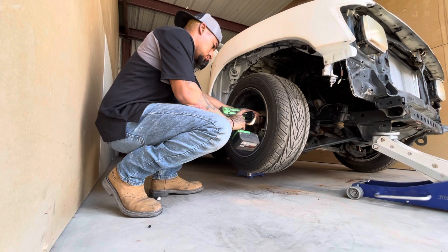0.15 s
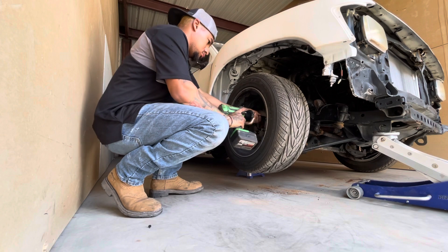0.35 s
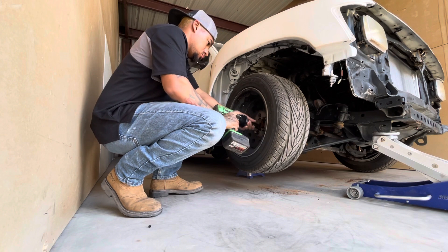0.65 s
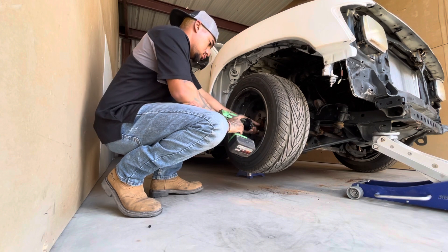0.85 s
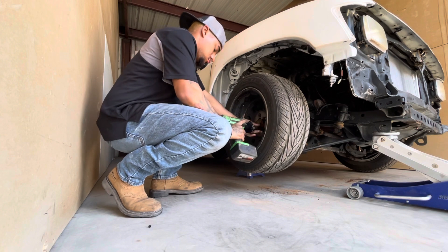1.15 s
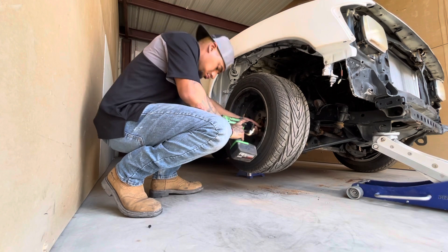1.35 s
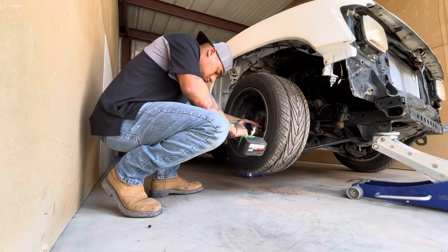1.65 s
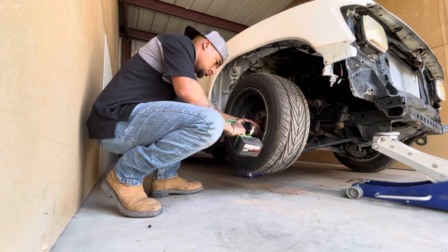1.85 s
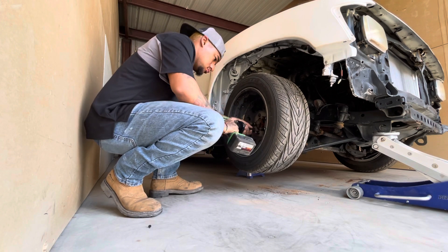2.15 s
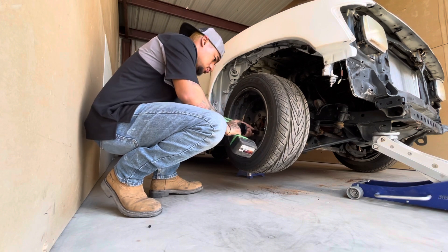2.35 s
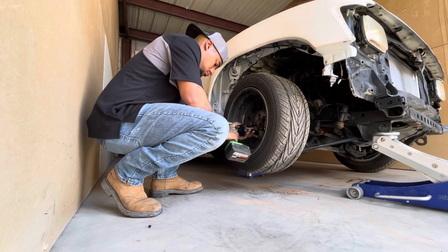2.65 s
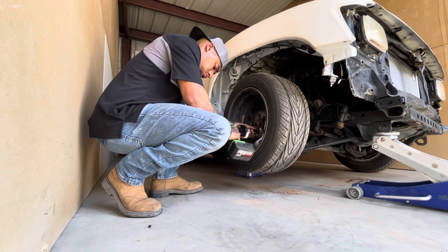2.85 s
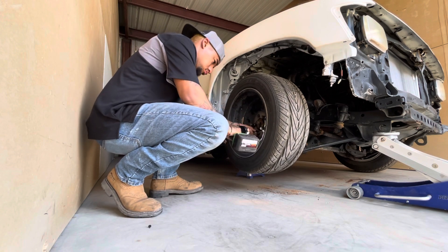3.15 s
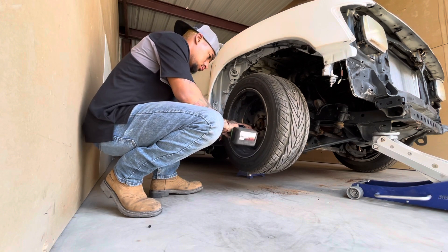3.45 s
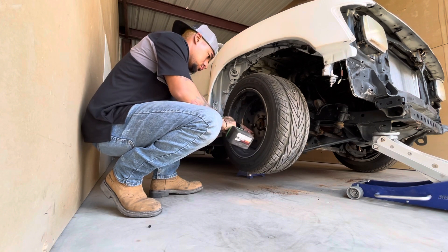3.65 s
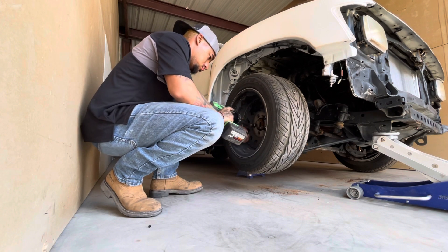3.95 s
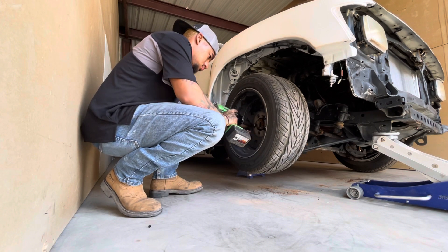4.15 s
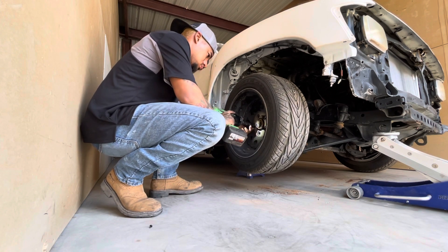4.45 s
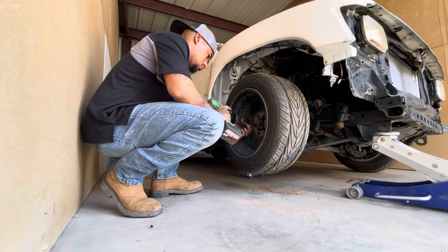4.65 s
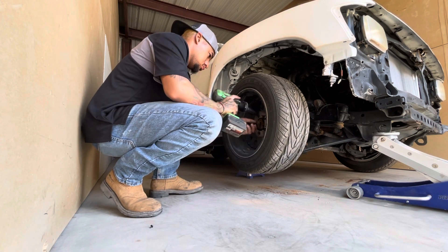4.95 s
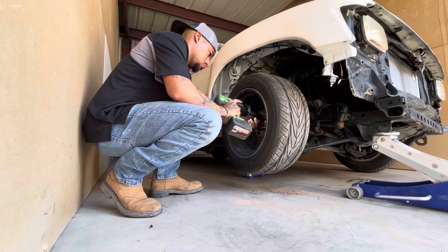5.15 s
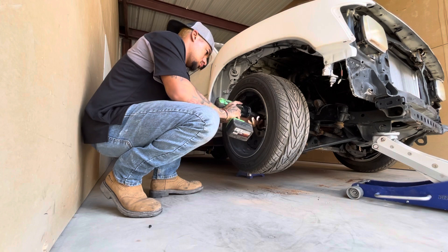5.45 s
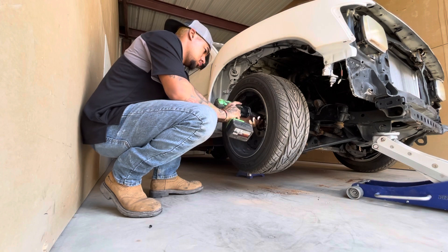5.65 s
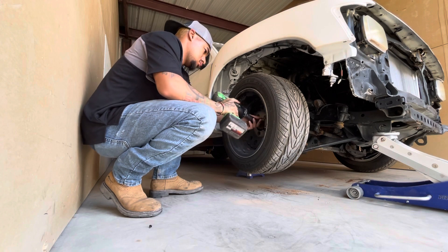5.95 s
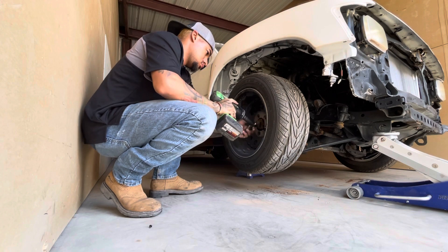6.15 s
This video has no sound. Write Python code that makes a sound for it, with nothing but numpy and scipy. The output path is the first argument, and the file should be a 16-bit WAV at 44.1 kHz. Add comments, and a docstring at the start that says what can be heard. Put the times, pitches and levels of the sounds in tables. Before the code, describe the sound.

Short rattling, whirring bursts from an impact wrench loosening wheel nuts, the socket clinking against steel in a slightly echoing garage.

```python
"""A cordless impact wrench loosens wheel nuts in a bare garage: five trigger pulls, three with blows.
The motor whines over rattling gear noise; the hammer cracks on the anvil and rings socket and hub.
The socket clacks and rubs on nuts and rim, and the shaken tyre booms in its low modes.
Wind brushes the two microphones; a faint whistle falls once over still air."""
import sys
import numpy as np
from scipy import signal
from scipy.fft import rfft, irfft, next_fast_len
from scipy.io import wavfile
from scipy.ndimage import uniform_filter1d

SR = 44100
rng = np.random.default_rng(int(sys.argv[2]) if len(sys.argv) > 2 else 0)


def to_wav(sig):
    """Store sig (one row per channel, or 1-D mono) as 16-bit WAV at the path in sys.argv[1].

    Samples outside -1..1 are clipped; the rate is SR.
    """
    pcm = np.clip(np.atleast_2d(sig), -1, 1) * 32767
    pcm = np.round(pcm).astype(np.int16)
    wavfile.write(sys.argv[1], SR, pcm.T)  # frames by channels


N = 277830
COAST_S = .3

# trigger pulls: start/s, release/s, spin-up/s, gear noise/dB, wheel shake/dB
PULLS = [(0, 0.29, 0.00032, -39, -46.5), (1.207, 1.806, 0.012, -42.5, -46.5),
         (2.757, 3.358, 0.011, -42, -47.5), (4.216, 4.405, 0.078, -42.5, -50.5),
         (5.132, 5.848, 0.033, -41.5, -50)]
# hammer blows: t/s, level/dB, tilt/(dB/oct)
BLOWS = [(0.0024, -26, 0.5), (0.032, -31, 0), (1.257, -20, 1), (1.29, -23.5, 0.5), (1.3217, -25.5, 3),
         (1.3477, -23.5, 1), (1.378, -28, 3.5), (1.41, -23.5, 0.5), (1.441, -29, 3.5), (1.475, -26.5, 6),
         (2.806, -21, 0), (2.836, -22, 2), (2.868, -24.5, 1), (2.8996, -26.5, 4), (2.9309, -26.5, 0),
         (2.9618, -31, 0)]
# clack and rub colour, band-limited near 12.5 kHz: f/Hz, level/dB
CLACK_RUB_COLOUR = [(40, -59), (150, -22), (400, -13.5), (1000, -2), (2300, -2), (5000, -7.5), (9500, -7.5),
                    (12200, -14), (12900, -37.5), (14000, -67.5)]


def amp(db):
    return 10 ** (np.asarray(db) / 20)


def unit_rms(x):
    return x / np.sqrt(np.mean(x ** 2) + 1e-20)


def at_hz(points, hz):
    """Interpolates over log frequency."""
    f, value = np.transpose(points)
    return np.interp(np.log(hz + 1), np.log(f + 1), value)


def add(mix, start_s, sound):
    part = mix[round(start_s * SR):][:len(sound)]
    part += sound[:len(part)]


def coloured(x, colour):
    """Zero-phase shaping for steady noise."""
    hz = np.fft.rfftfreq(x.shape[-1], 1 / SR)
    return irfft(rfft(x) * amp(at_hz(colour, hz)), x.shape[-1])


def coloured_causal(x, colour, tilt_db_oct):
    """Minimum-phase shaping by folded cepstrum, tilted about 3 kHz."""
    hz = np.fft.rfftfreq(len(x), 1 / SR)
    gain_db = at_hz(colour, hz) + tilt_db_oct * np.log2((hz + 200) / 3000)
    cepstrum = irfft(np.log(amp(gain_db)))
    cepstrum[1:len(x) // 2] *= 2
    cepstrum[len(x) // 2 + 1:] = 0
    return irfft(rfft(x) * np.exp(rfft(cepstrum)))


def wander(count, span_samples):
    """Smooth random drift, unit RMS."""
    drift = uniform_filter1d(rng.standard_normal(count), span_samples)
    return unit_rms(uniform_filter1d(drift, span_samples))


def resonate(x, hz, width_hz, stages=1):
    """Unit-gain resonance: shift down, smooth, shift back."""
    carrier = np.exp(2j * np.pi * np.cumsum(hz * np.ones(len(x))) / SR)
    pole = np.exp(-np.pi * width_hz / SR)
    for _ in range(stages):
        x = 2 * (carrier * signal.lfilter([1 - pole], [1, -pole], x / carrier)).real
    return x


def swell_power(peak_s, db, rise_db_per_s, fall_db_per_s):
    t = np.arange(N) / SR - peak_s
    return amp(db + np.minimum(t * rise_db_per_s, -t * fall_db_per_s)) ** 2


def motor_db(t, held_s, spin_up_s):
    """Motor level: swell, hold, brake, coast."""
    brake_s, coast_db_per_s = .02, 143
    off_s = np.maximum(t - held_s, 0)
    swell_db = -16 * np.maximum(1 - t / spin_up_s, 0) ** 2
    brake_db = -2 * np.minimum(off_s / brake_s, 1)
    return swell_db + brake_db - coast_db_per_s * off_s


def gear_noise(start_s, release_s, spin_up_s, db):
    """Broadband rattle of gears and fan."""
    # gear noise colour, band-limited near 12.5 kHz: f/Hz, level/dB
    colour = [(90, -22), (160, -4.5), (500, -20), (1000, -8.5), (1700, 0), (3000, -5), (6000, -7),
              (9500, -5), (12200, -8.5), (12900, -48), (14000, -83)]
    t = np.arange(0, release_s - start_s + COAST_S, 1 / SR)
    level_db = db + motor_db(t, release_s - start_s, spin_up_s)
    blows_s = [s - start_s for s, *_ in BLOWS if start_s <= s < release_s]
    if blows_s:  # dip once the last blow frees the nut
        level_db -= 3.5 * np.exp(-((t - blows_s[-1] - .052) / .037) ** 2)
    rattle = amp(2 * wander(len(t), 83)) * rng.standard_normal(len(t))
    return amp(level_db) * unit_rms(coloured(rattle, colour)) * signal.windows.tukey(len(t), .01)


def wheel_shake():
    """Amplitude on the wheel: motor, blows and shoves add in power."""
    # tool shoved against the wheel: t/s, level/dB, fade/(dB/s)
    shoves = [(0.701, -49.5, 23), (2.268, -41, 63.5), (2.657, -40, 155.5), (4.1, -46, 126),
              (4.972, -38.5, 86), (5.3, -39, 16), (5.891, -69, 203)]
    rest_db, shove_rise_s = -61, .011
    power = np.full(N, amp(rest_db) ** 2)
    for start_s, release_s, spin_up_s, _, shake_db in PULLS:
        t = np.arange(0, release_s - start_s + COAST_S, 1 / SR)
        add(power, start_s, amp(shake_db + motor_db(t, release_s - start_s, spin_up_s)) ** 2)
    for s, db, _ in BLOWS:
        power += swell_power(s + .0057, db - 17, rise_db_per_s=900, fall_db_per_s=109)
    for s, db, fade_db_per_s in shoves:
        power += swell_power(s + shove_rise_s, db, 20 / shove_rise_s, fade_db_per_s)
    return np.sqrt(power)


def tyre_boom():
    """Shaking excites the low modes of tyre and body."""
    # tyre modes: f/Hz, level/dB, decay/s
    modes = [(103.1, 4, 0.15), (144.4, -5, 0.093), (184, -6, 0.042), (241, -8.5, 0.27), (320, -14.5, 0.36),
             (402.6, -12.5, 0.05), (458, -7.5, 0.6), (727, -12, 0.021)]
    hz = np.fft.rfftfreq(N, 1 / SR)
    response = sum(amp(db) / (1 + 1j * (hz - f) * decay_s) for f, db, decay_s in modes)
    response /= 1 + (hz / 1200) ** 4  # the boom fades away above about 1.2 kHz
    response *= hz ** 2 / (hz ** 2 + 60 ** 2)
    return wheel_shake() * unit_rms(irfft(rfft(rng.standard_normal(N)) * response, N))


def wind():
    """Low lumpy pressure, mostly separate at each microphone."""
    # breeze: t/s, level/dB
    breeze = [(0.0, -42.5), (0.26, -50), (0.65, -53.5), (1.09, -58), (1.32, -86), (1.61, -67), (1.88, -48),
              (2.0, -54.5), (2.39, -50.5), (2.8, -67.5), (2.95, -52), (3.44, -51), (3.77, -50), (3.98, -51),
              (4.3, -58), (4.51, -53.5), (4.84, -69), (5.05, -46), (5.75, -58), (6.16, -73), (6.3, -75.5)]
    # buffets: peak/s, level/dB, deep-bass share/1
    gusts = [(3.628, -51, .5), (3.733, -44, 0.19), (3.894, -38.5, 0), (3.968, -54.5, 0.53),
             (4.067, -47, 0.45), (4.181, -44, 0.99), (5.82, -42, 1)]
    # colours: f/Hz, level/dB
    deep_colour = [(15, -40), (40, -10), (60, 1.5), (85, -1), (150, -10), (400, -49.5), (2000, -100)]
    gust_colour = [(50, -13.5), (130, 1.5), (250, -4), (450, -13), (800, -48.5), (2000, -100)]
    common, left, right = rng.standard_normal((3, N))
    air = np.array([left, right]) + .091 * common
    lumps = amp(.64 * wander(N, 500))
    breeze_power = amp(np.interp(np.arange(N) / SR, *np.transpose(breeze))) ** 2
    swells = np.array([swell_power(s, db, 252, 310) for s, db, _ in gusts])
    deep_share = np.array([share for *_, share in gusts])
    rumble = np.sqrt(breeze_power + deep_share @ swells) * unit_rms(coloured(air, deep_colour))
    buffets = np.sqrt((1 - deep_share) @ swells) * unit_rms(coloured(air, gust_colour))
    return lumps * (rumble + buffets)


def still_air(db):
    """Steady stereo noise floor."""
    # noise floor colour: f/Hz, level/dB
    colour = [(180, -39.5), (300, -5.5), (430, -16.5), (620, -22), (1320, -17), (3400, -37.5),
              (4500, -39.5), (9000, -48.5), (11000, -108)]
    return amp(db) * unit_rms(coloured(rng.standard_normal((2, N)), colour))


def hammer_blow(db, tilt_db_oct):
    """A crack, doubled by the floor bounce, rings anvil, socket and hub; the hammer rebounds once."""
    # crack colour, band-limited near 12.5 kHz: f/Hz, level/dB
    colour = [(90, -37), (160, -12.5), (400, -3.5), (700, -4), (1400, 0.5), (2200, -2), (3400, 0.5),
              (6000, -5.5), (9500, -2.5), (12300, -4), (13200, -26.5), (16000, -39)]
    # anvil, socket and hub modes: f/Hz, width/Hz, level/dB
    modes = [(2050, 280, -18), (2800, 31, -6.5), (3390, 600, -11), (4935, 280, -8.5), (5730, 71, -5.5),
             (6950, 98, -20.5), (7600, 60, -7.5), (7880, 90, 3), (9160, 150, 2)]
    t = np.arange(4096) / SR

    def burst(start_s, tau_s):
        age = np.maximum(t - start_s, 0) / tau_s
        return age ** 2 * np.exp(-age)

    strike = burst(0, .001) + .35 * burst(.0033, .001)
    rebound = .079 * burst(.0053, .0054)
    crack = (strike + rebound) * rng.standard_normal(len(t))
    scatter_db = 3 * rng.standard_normal(len(modes))  # no two blows land alike
    ring = sum(amp(mode_db + offset_db) * resonate(crack, hz, width_hz)
               for (hz, width_hz, mode_db), offset_db in zip(modes, scatter_db))
    hub_clank = resonate(crack, hz=2000, width_hz=950, stages=2)
    impact = unit_rms(coloured_causal(crack, colour, tilt_db_oct))
    return amp(db) * unit_rms(impact + .41 * unit_rms(ring) + amp(-20) * unit_rms(hub_clank))


def clack(db, tilt_db_oct, clank_hz, clank_db, rise_ms):
    """A short steel scrape with one pitched clank rings the rim."""
    # rim modes: f/Hz, level/dB, t60/s
    modes = [(758, -2, .045), (1174, -1, 0.14), (2470, -3.5, .045), (2820, -8.5, 0.035),
             (4000, -12.5, .045), (4040, -7.5, .045), (5700, -10.5, .045), (9050, -11.5, 0.041)]
    t = np.arange(4096) / SR
    age = t * 1000 / rise_ms
    scrape = age * np.exp(-age) * rng.standard_normal(len(t))
    scatter_db = 3 * rng.standard_normal(len(modes))  # each touch finds another spot
    ring = sum(amp(mode_db + offset_db - 60 * t / t60_s) * np.sin(2 * np.pi * hz * t)
               for (hz, mode_db, t60_s), offset_db in zip(modes, scatter_db))
    contact = unit_rms(scrape) + .081 * unit_rms(ring) * (1 - np.exp(-age))
    contact = unit_rms(coloured_causal(contact, CLACK_RUB_COLOUR, tilt_db_oct))
    clank = unit_rms(resonate(scrape, clank_hz, width_hz=850, stages=2))
    return amp(db) * unit_rms(contact + amp(clank_db) * clank)


def motor_whine(track, mesh_db, flare_at_s):
    """Five partials follow motor speed through the housing; the gear mesh adds three rough lines."""
    # housing radiation: f/Hz, gain/dB
    housing = [(1400, 19), (1700, 10.5), (2200, 4), (3400, 4), (4500, -3.5), (5500, 8.5), (6500, 3.5),
               (8300, -0.5), (9300, -0.5), (12000, 2)]
    # partials 2-5: offset/dB
    offsets_db = [-1, 0, -2, -6]
    mesh_ratio, flutter_db = .545, 3.2  # partials flutter as the tool shifts in the hand
    s, hz, fundamental_db, overtones_db = np.transpose(track)
    t = np.arange(s[0], s[-1], 1 / SR)
    hz = uniform_filter1d(np.interp(t, s, hz), 600)  # rotor inertia
    phase = 2 * np.pi * np.cumsum(hz * (1 + .0015 * wander(len(t), 150))) / SR
    levels_db = [np.interp(t, s, fundamental_db)]
    levels_db += [np.interp(t, s, overtones_db) + db for db in offsets_db]
    whine = np.zeros(len(t))
    for k, db in enumerate(levels_db, 1):
        radiated_db = db + at_hz(housing, k * hz) + flutter_db * wander(len(t), 400)
        whine += amp(radiated_db) * np.sqrt(2) * np.sin(k * phase)
    noise = rng.standard_normal(len(t))
    mesh = sum(amp(db) * unit_rms(resonate(noise, k * mesh_ratio * hz, width_hz=70))
               for k, db in enumerate([4, -2, -7], 1))
    throb_db = 4.5 * wander(len(t), 350)  # the loose socket loads the gears unevenly
    flare_db = 5.5 * np.exp(-((t - flare_at_s) / .022) ** 2)
    return (whine + amp(mesh_db + throb_db + flare_db) * mesh) * signal.windows.tukey(len(t), .08)


def socket_rub(length_s, db):
    """Uneven grains of steel sliding on steel."""
    count = round(length_s * SR)
    grains = amp(2.4 * wander(count, 250)) * rng.standard_normal(count)
    colour = [(hz, level_db - 5 * np.log2(hz / 3000)) for hz, level_db in CLACK_RUB_COLOUR]
    return amp(db) * unit_rms(coloured(grains, colour)) * signal.windows.tukey(count, .3)


def faint_whistle():
    """Noise through a narrow falling resonance."""
    # glide: t/s, f/Hz, level/dB
    glide = [(3.86, 4560, -88.5), (3.9, 4370, -75), (3.939, 4160, -80.5), (3.96, 3400, -74.5),
             (4.019, 3530, -84)]
    s, hz, db = np.transpose(glide)
    t = np.arange(s[0], s[-1], 1 / SR)
    tone = resonate(rng.standard_normal(len(t)), np.interp(t, s, hz), width_hz=700, stages=2)
    track = np.zeros(N)
    add(track, s[0], amp(np.interp(t, s, db)) * unit_rms(tone))
    return track


def garage(x):
    """Sparse reflections of random sign, decaying per band; two tails take the sound in turn."""
    # reverberation: f/Hz, t60/s
    decay = [(100, 0.31), (300, 0.74), (900, 0.55), (2000, 0.46), (5000, 0.43), (12000, 0.17)]
    room = np.zeros((2, N))
    crossfade = np.pi * 7.3 * np.arange(N) / SR
    for share in np.cos(crossfade), np.sin(crossfade):
        taps = np.zeros((2, 36000))
        arrivals = np.arange(300, 35980, 20) + rng.integers(0, 20, (2, 1784))
        np.put_along_axis(taps, arrivals, rng.choice([-1., 1.], arrivals.shape), 1)
        hz, t, bands = signal.stft(taps, SR, nperseg=256)
        bands *= amp(-60 * t / at_hz(decay, hz)[:, None])
        tail = signal.istft(bands, SR, nperseg=256)[1]
        tail /= np.linalg.norm(tail[0])
        room += signal.fftconvolve((x * share)[None], tail, axes=1)[:, :N]
    return room


def scene():
    """Tool and wheel, direct and reverberant, with wind and air."""
    # one track per free spin: t/s, f/Hz, fundamental/dB, overtones/dB (before housing gain)
    spins = [
        [(.12, 2208, -53, -55), (.19, 2252, -54, -59), (.27, 2270, -49, -52), (.34, 2307, -46, -50)],
        [(1.55, 2222, -70, -66), (1.63, 2277, -61, -51), (1.72, 2310, -52, -53), (1.86, 2367, -56, -54)],
        [(3.04, 2156, -64, -64), (3.11, 2247, -58, -54), (3.22, 2320, -53, -62), (3.33, 2360, -60, -59),
         (3.38, 2374, -54, -55)],
        [(4.235, 1365, -62, -67), (4.259, 1692, -43.5, -60), (4.281, 2064, -48, -54), (4.31, 2246, -50.5, -55),
         (4.357, 2344, -51, -54), (4.405, 2224, -52, -51), (4.44, 2060, -46, -60)],
        [(5.145, 1240, -59, -58), (5.168, 1607, -43, -64), (5.19, 2031, -63, -54), (5.212, 2190, -50, -49),
         (5.27, 2292, -53, -49.5), (5.34, 2395, -51, -52), (5.374, 2405, -42, -50), (5.416, 2393, -54, -49),
         (5.466, 2232, -49, -49.5), (5.5, 2174, -49, -49), (5.544, 2058, -50, -47), (5.616, 2078, -49.5, -42),
         (5.66, 2132, -49, -61), (5.71, 2153, -51, -54), (5.762, 1980, -56, -48), (5.83, 1766, -47, -57),
         (5.876, 1559, -45, -49), (5.89, 1520, -44, -54)],
    ]
    # gear mesh per spin: level/dB, flare time/s
    meshes = [(-45, 0.22), (-46.5, 1.78), (-48.5, 3.11), (-51.5, 4.29), (-58, 5.3)]
    # socket sliding on nut and rim: start/s, end/s, level/dB
    rubs = [(0.951, 1.198, -65.5), (2.413, 2.6, -71), (4.059, 4.21, -71), (4.443, 4.61, -76.5),
            (4.997, 5.144, -67.5)]
    # socket, trigger, clutch, nuts: t/s, level/dB, tilt/(dB/oct), clank/Hz, clank re scrape/dB, rise/ms
    clacks = [(.091, -44, -4.5, 1790, -10, 2.3), (.3, -47.5, -4, 2350, -8, 3.7),
              (.761, -51.5, -8, 2685, -5, 6), (0.771, -60.5, 0, 2750, 7, 2.1),
              (.785, -53.5, -3.5, 2800, -8, 1.7), (1.011, -64, -8, 3300, -15, 2.5),
              (1.07, -73, -10, 1750, 15, 1.4), (1.118, -80, 3, 4170, -3, 2),
              (1.148, -76, -2, 2380, -7, 2.1), (1.178, -75, -1, 2000, -3, 2.1),
              (1.199, -54, -4, 4020, -7, 4.6), (1.2191, -34.5, -0.5, 2020, -19, 2.9),
              (1.669, -47, -3, 2450, -8, 0.98), (1.743, -47, 4, 3840, 2, 3.4),
              (1.782, -51.5, -1, 1836, -2.5, 2.8), (1.826, -46.5, -1.5, 1648, -7.5, 3.5),
              (1.877, -53, 5, 2610, -8.5, 3.2), (2.273, -42, -3.5, 2500, -1.5, 2.55),
              (2.484, -65.5, -4.5, 1580, -2, 2.9), (2.496, -68.5, -4, 2500, -4, 2.6),
              (2.66, -52, -5, 1870, -5, 2.2), (2.748, -55, -4, 4900, -3, 5.6),
              (2.7665, -38.5, 0, 1600, -14, 1.9), (3.365, -42, -1.5, 2300, -8, 3.5),
              (3.593, -70, 0, 2175, -10, 3), (4.038, -57.5, -4, 2300, -9, 3.4),
              (4.051, -53, 0.5, 1550, -16, 2.1), (4.222, -51, -1.5, 2060, -11, 4.7),
              (4.362, -51, -3, 2420, -12, 3), (4.432, -40, 2.5, 1830, 0, 2.25),
              (4.443, -53, -5.5, 1940, 0, 2), (4.482, -55.5, 5, 2007, -6.5, 5.2),
              (4.511, -59, -2, 2200, -4, 2), (4.5348, -55, -1, 1540, 5, 1.2),
              (4.547, -59.5, 3, 2110, -6, 1.9), (4.709, -65.5, -1.5, 1817, -1, 2),
              (4.974, -51, -1.5, 2070, -16.5, 2.7), (5.132, -51, -10, 1580, -10, 5.2),
              (5.1537, -39.5, 2.5, 1940, -19, 2.2), (5.203, -44, -11.5, 1900, -8, 4.1),
              (5.291, -41.5, -0.5, 1470, -14, 2.3), (5.3574, -43, 2, 6200, -13, 3.4),
              (5.5078, -45.5, -3.5, 1850, -11, 1.5), (5.585, -51.5, 2.5, 9000, -1, 3.5),
              (5.6585, -41.5, 4, 8950, -2, 1.6), (5.8855, -42, -1, 2220, -2.5, 2.1),
              (5.94, -49, 1.5, 1730, 6.5, 2.6)]
    gears, whine, hammer, contacts = np.zeros((4, N))
    for start_s, release_s, spin_up_s, db, _ in PULLS:
        add(gears, start_s, gear_noise(start_s, release_s, spin_up_s, db))
    for track, mesh in zip(spins, meshes):
        add(whine, track[0][0], motor_whine(track, *mesh))
    for start_s, end_s, db in rubs:
        add(contacts, start_s, socket_rub(end_s - start_s, db))
    for s, *row in BLOWS:
        add(hammer, s, hammer_blow(*row))
    for s, *row in clacks:
        add(contacts, s, clack(*row))
    whistle = faint_whistle()
    lowpass = signal.firwin(255, 12600, window=("kaiser", 9), fs=SR)
    left = signal.oaconvolve(gears + whine + contacts, lowpass, "same") + hammer + tyre_boom()
    lag_samples = 20  # the wheel is nearer the left microphone
    right = np.pad(left, (lag_samples, 0))[:N]
    send = gears + amp(-11) * whine + amp(-4) * hammer + amp(-1) * contacts + amp(-2) * whistle
    room = garage(signal.oaconvolve(send, lowpass, "same"))
    return np.array([left, right]) + room + still_air(db=-67) + wind() + whistle


def record(dry):
    """Two close ports share the top octave; the left favours 5-8 kHz. Soft clip, then band limit."""
    # treble common to both ports: f/Hz, share/1
    common = [(8400, 0), (9600, .93), (10200, .99), (11200, .88), (12000, .995), (16000, .95)]
    # left over right: f/Hz, level/dB
    balance = [(100, 0), (400, 3), (2000, 1.5), (4300, 3), (5200, 9), (6800, 6), (7800, 8.5), (8600, 1)]
    in_phase_hz, half_turn_hz, edge_hz = 12000, 1900, 16100
    size = next_fast_len(N + 2048)
    hz = np.fft.rfftfreq(size, 1 / SR)
    left, right = rfft(dry, size)
    share = at_hz(common, hz)
    phase_turn = np.exp(1j * np.pi * np.minimum(hz - in_phase_hz, 700) / half_turn_hz)
    right = np.sqrt(1 - share ** 2) * right + share * left * phase_turn
    lean = amp(at_hz(balance, hz) / 2)
    ports = irfft(np.array([left * lean, right / lean]), size)[:, :N]
    clipped = ports / (1 + ports ** 4) ** .25
    lowpass = signal.firwin(511, edge_hz, window=("kaiser", 9), fs=SR)
    return signal.oaconvolve(clipped, lowpass[None], "same")


dry = scene()
out = record(dry)
to_wav(out)
```